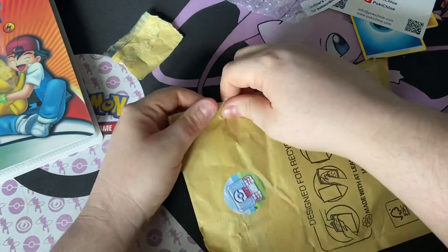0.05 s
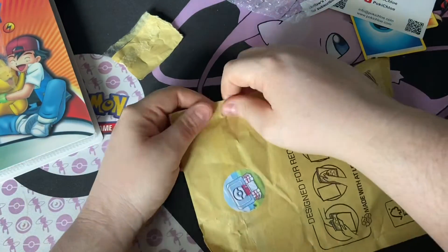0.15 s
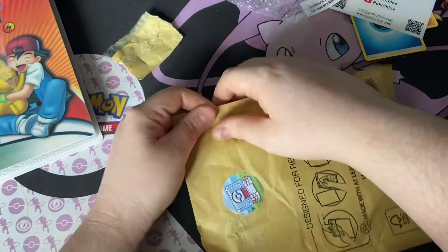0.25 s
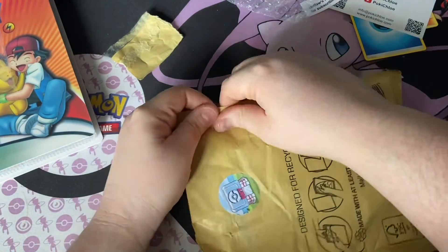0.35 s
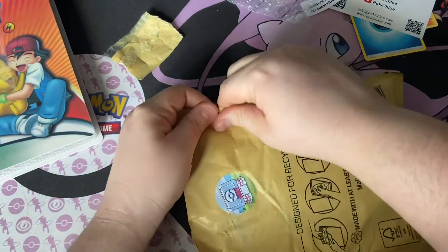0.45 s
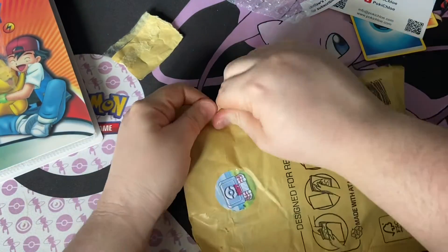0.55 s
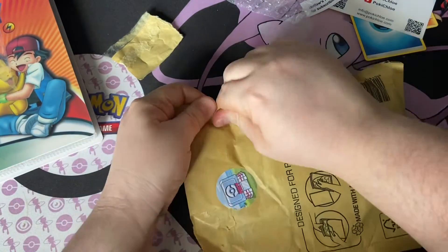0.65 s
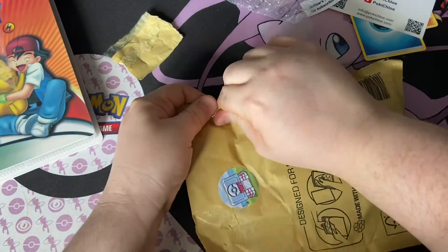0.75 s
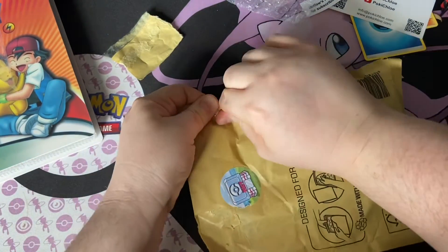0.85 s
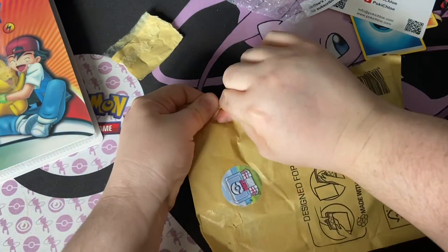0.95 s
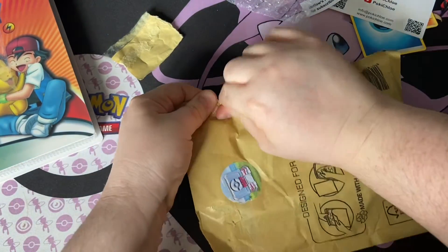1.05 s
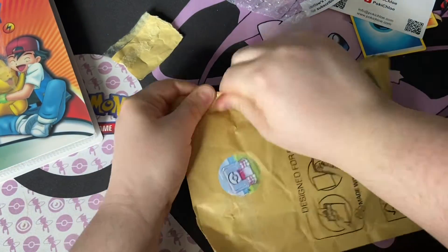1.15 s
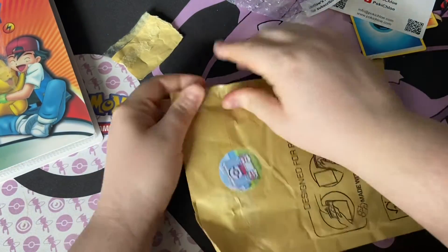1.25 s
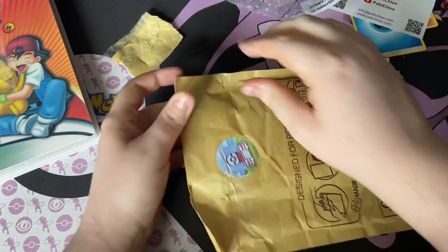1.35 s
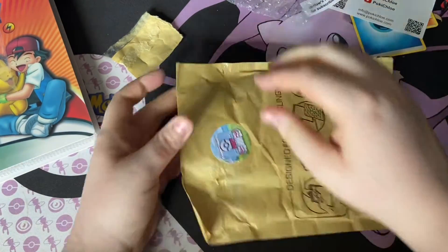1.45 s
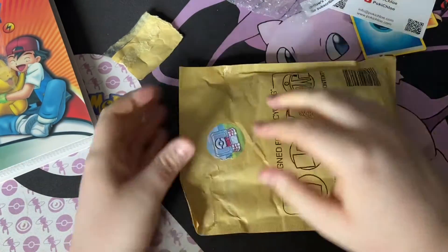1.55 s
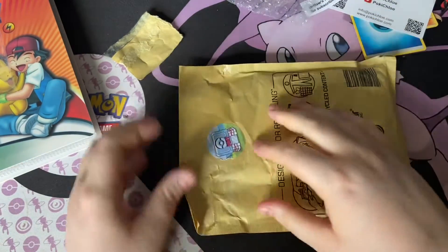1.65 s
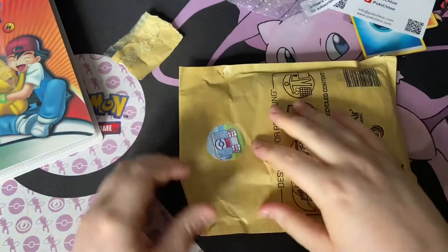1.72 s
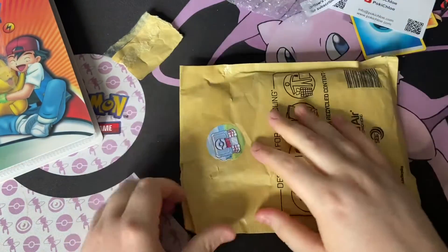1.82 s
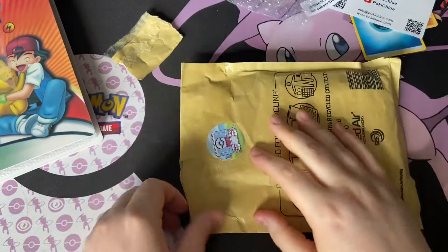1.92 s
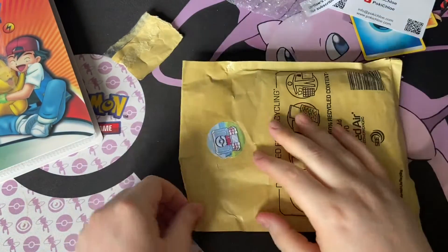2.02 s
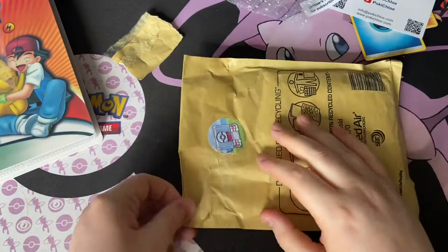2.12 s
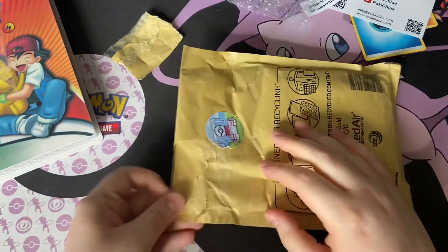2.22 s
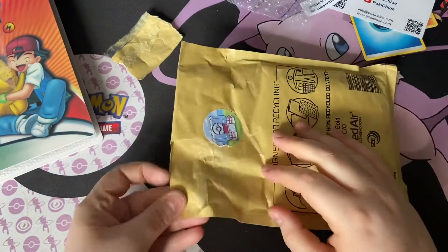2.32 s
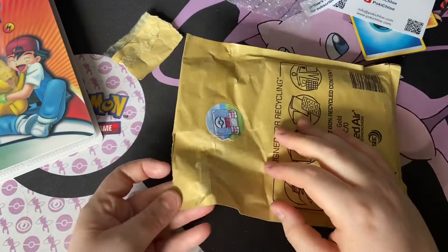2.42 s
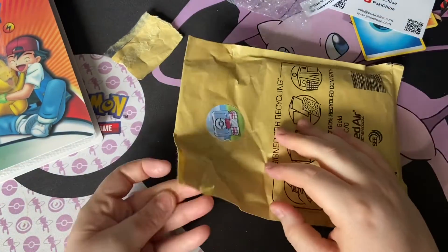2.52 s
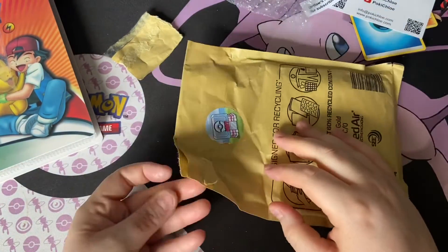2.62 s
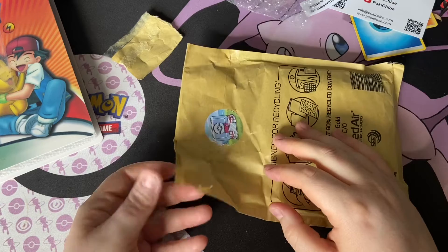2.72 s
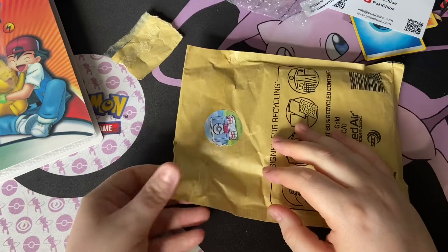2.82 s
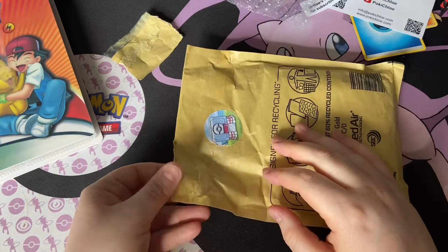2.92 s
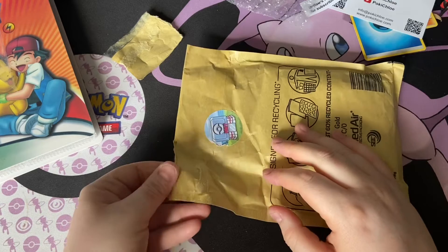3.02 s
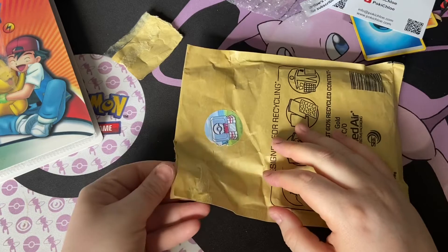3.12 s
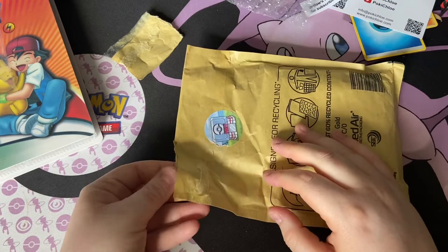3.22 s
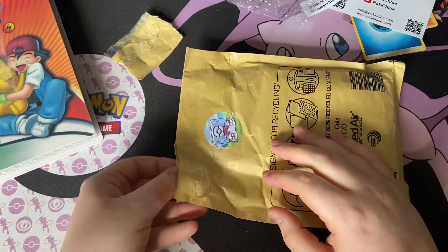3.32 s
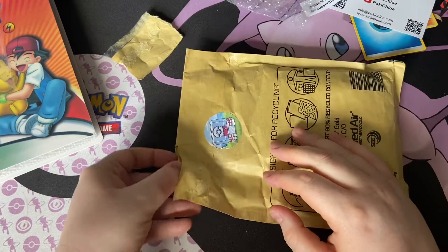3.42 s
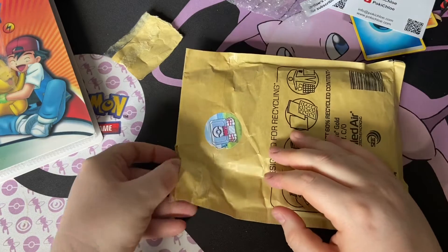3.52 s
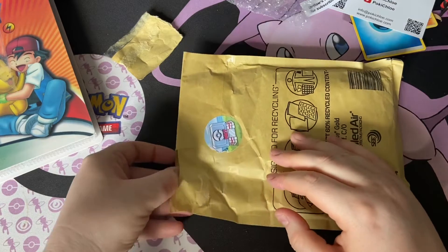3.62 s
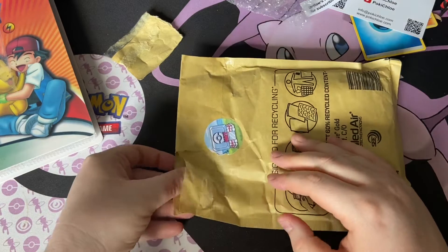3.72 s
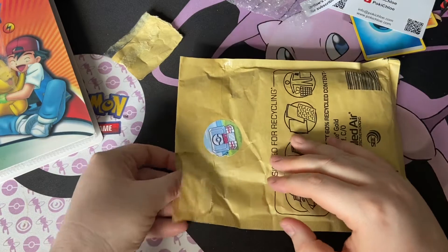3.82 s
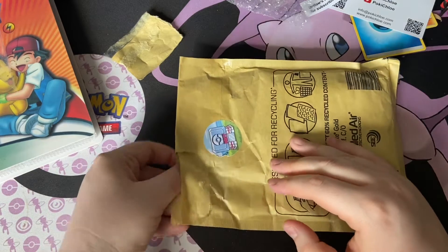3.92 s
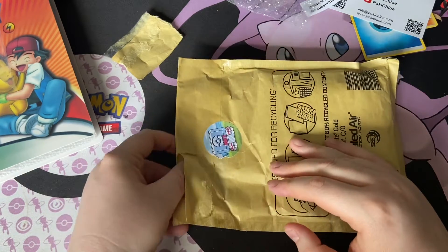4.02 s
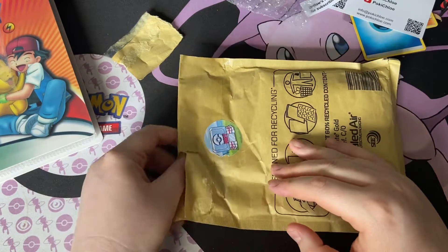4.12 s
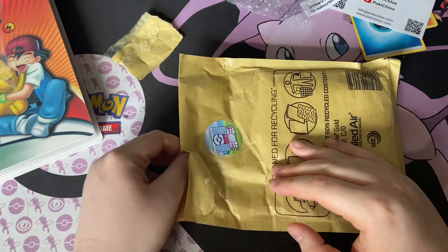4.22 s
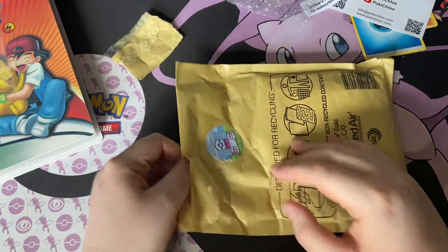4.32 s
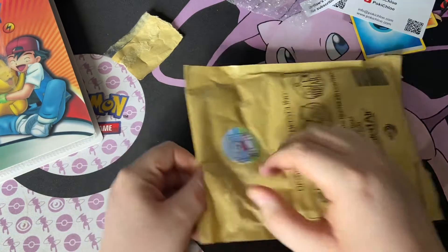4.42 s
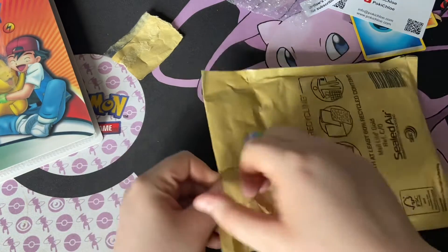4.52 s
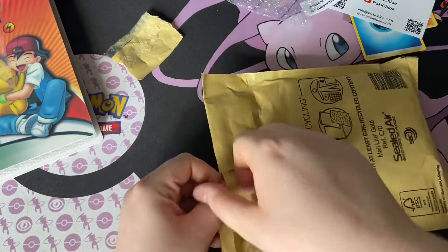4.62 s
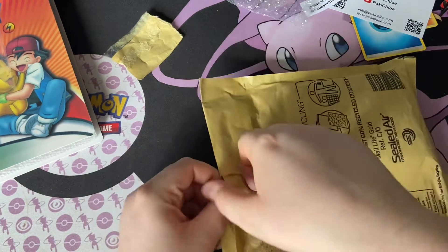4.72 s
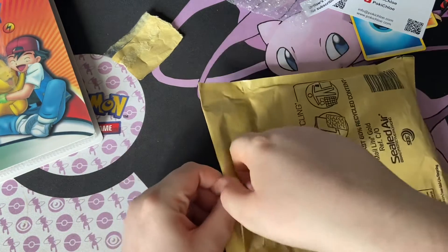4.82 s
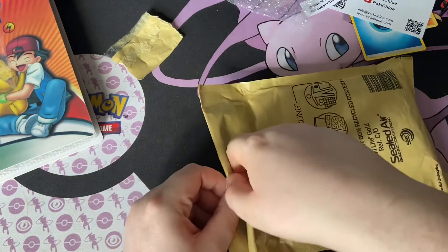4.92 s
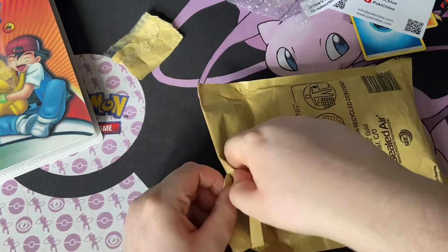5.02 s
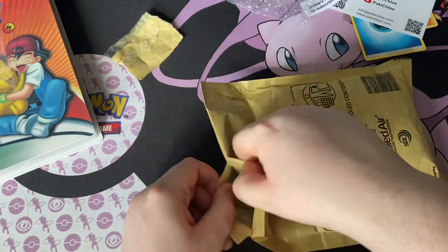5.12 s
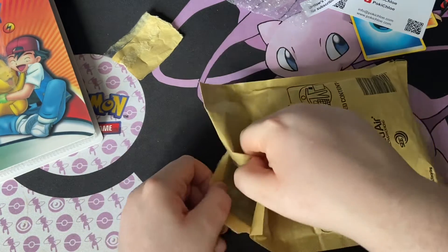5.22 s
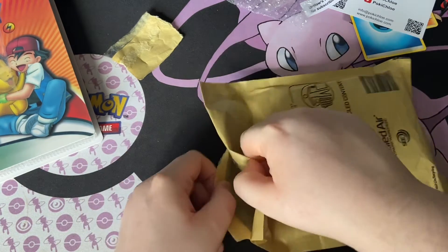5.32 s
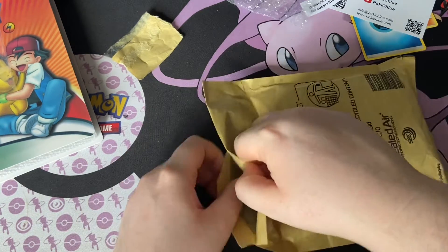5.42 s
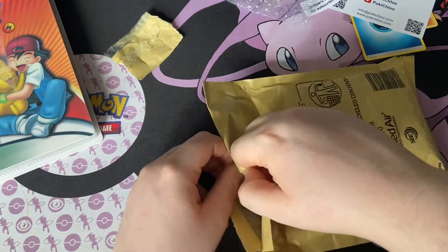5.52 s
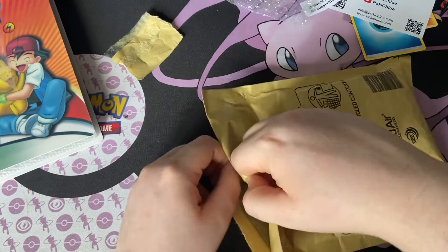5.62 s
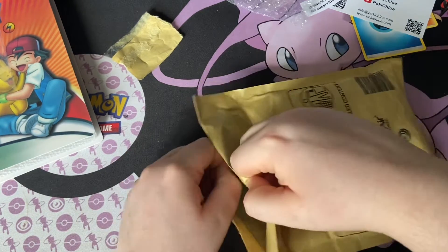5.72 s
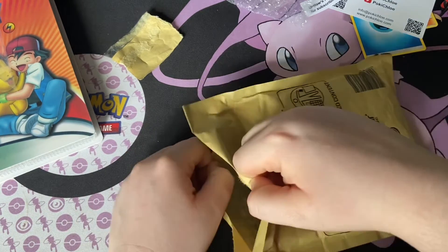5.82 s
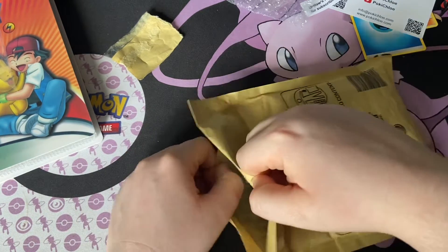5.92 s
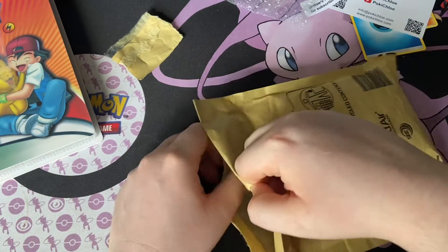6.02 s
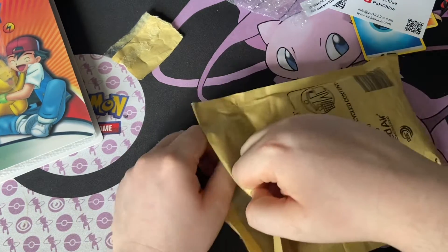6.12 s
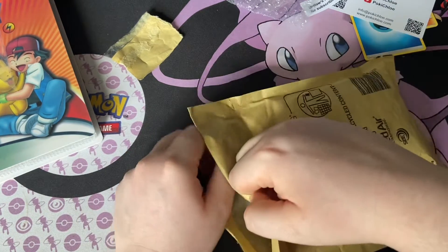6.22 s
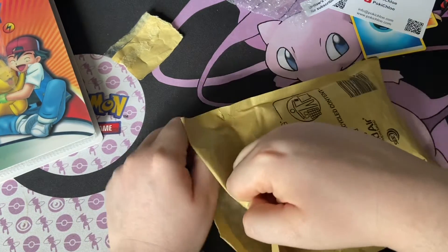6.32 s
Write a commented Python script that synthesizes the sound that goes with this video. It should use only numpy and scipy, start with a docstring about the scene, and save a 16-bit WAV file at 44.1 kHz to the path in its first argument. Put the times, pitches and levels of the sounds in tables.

```python
"""A stiff padded paper mailer is picked at, bent and torn open by hand on a desk in a small room.
From the start creases buckle with sharp snaps and ringing panels over grainy rubbing of fingers on paper.
Early on the flexing pouch knocks hollowly; then soft bumps on the desk ring its resonances.
Near the end the seam gives way in short rips: showers of fibre clicks with stick-slip creases.
Faint room reflections follow the paper; a low rumble and a hiss of filtered noise run throughout."""
import sys
import numpy as np
from scipy import signal
from scipy.fft import rfft, irfft, next_fast_len
from scipy.io import wavfile
from scipy.ndimage import map_coordinates

SR = 44100
rng = np.random.default_rng(int(sys.argv[2]) if len(sys.argv) > 2 else 0)


def inscribe(sig):
    """Save sig as 16-bit PCM at rate SR to the path in sys.argv[1].

    A 1-D sig is mono; a 2-D sig holds one channel per row.
    Samples are clipped to [-1, 1] before scaling.
    """
    pcm = np.round(np.clip(np.atleast_2d(sig).T, -1, 1) * 32767)
    wavfile.write(sys.argv[1], SR, pcm.astype(np.int16))


N = 280276
TIME_S = np.arange(N) / SR
EDGES_HZ = np.geomspace(170, 17500, 16)
BANDS_HZ = list(zip(EDGES_HZ, EDGES_HZ[1:]))
PANEL_HZ = 2060  # reference panel


def from_db(db):
    """Decibels to gain."""
    return 10 ** (np.asarray(db) / 20)


def rms_one(x):
    """Scale to an rms of 1."""
    return x / np.sqrt(np.mean(x ** 2) + 1e-20)


def over_10_ms(x):
    """Scale to the energy of 10 ms at an rms of 1."""
    energy = np.sum(x ** 2, axis=-1, keepdims=True)
    return x / np.sqrt(energy / (SR / 100) + 1e-20)


def at_hz(points, hz):
    """Read a curve on a log-frequency axis."""
    points_hz, values = np.transpose(points)
    return np.interp(np.log(hz), np.log(points_hz), values)


def band_pass(x, low_hz, high_hz):
    """Causal band filter along the last axis."""
    sos = signal.butter(2, [low_hz, high_hz], "band", fs=SR, output="sos")
    return signal.sosfilt(sos, x + 1e-18)


def drift(per_s):
    """Random wander through normal knots, per_s of them each second."""
    knots = rng.standard_normal(8192)
    return np.interp(TIME_S * per_s, np.arange(len(knots)), knots)


def swell(middle_s, half_s):
    """A smooth rise and fall around a moment."""
    return np.exp(-((TIME_S - middle_s) / half_s) ** 2)


# likeness of the two microphone ports: hz, likeness (0 to 1)
PORT_LIKENESS = [(50, 0.98), (250, 0.66), (1000, 0.81), (2500, 0.74), (5000, 0.42), (8000, 1), (15000, 1)]


def ports(mid, side, hz):
    """Left and right share most of the sound; the rest is their own."""
    alike = np.clip(at_hz(PORT_LIKENESS, hz), 0, .999)
    shared = np.sqrt((1 + alike) / 2) * mid
    own = np.sqrt((1 - alike) / 2) * side
    return shared + own * np.array([[1], [-1]])


# spectrum of a snap: hz, band_db
SNAP_SPECTRUM = [(200, -31), (380, -15), (550, -22), (800, -6), (1150, -4), (1600, -6.5), (2700, -5),
                 (4500, -6.5), (7500, -4.5), (11000, -5.5), (15000, -11.5)]


def buckle(rows, rise=0.14, cycles=0.8, ring_cycles=3.85, ring_db=-1.0, flutter_db=-17.0, flutter_s=0.0097):
    """Each crease flips in a burst of cracks; the panel beside it rings a few cycles and the sheet flutters on."""
    # rows: start_s, level_db, body_db, treble_db, ring_hz, decay_s
    start_s, level_db, body_db, treble_db, ring_hz, decay_s = np.array(rows, float).T[:, :, None]
    t_s = np.arange(1600) / SR
    onset = 1 - np.exp(-t_s / (rise * decay_s))
    flutter = from_db(flutter_db) * np.exp(-t_s / flutter_s)

    def tilt_db(hz):
        """Body below, treble above."""
        body_share = at_hz([(1000, 0.94), (2000, 0.082)], hz)
        treble_share = at_hz([(3200, 0.0021), (7500, 1)], hz)
        return body_db * body_share + treble_db * treble_share

    cracks = rng.standard_normal((2, 2, len(start_s), len(t_s)))
    bursts = 0
    for k, (low_hz, high_hz) in enumerate(BANDS_HZ):
        hz = np.sqrt(low_hz * high_hz)
        fade_s = np.hypot(decay_s, cycles / hz)  # low bands last longer
        shape = onset * (np.exp(-t_s / fade_s) + flutter)
        band = over_10_ms(band_pass(cracks[k % 2] * shape, low_hz, high_hz))
        mid, side = band * from_db(at_hz(SNAP_SPECTRUM, hz) + tilt_db(hz))
        bursts = bursts + ports(mid[:, None], side[:, None], hz)

    ring = np.sin(2 * np.pi * ring_hz * t_s) * np.exp(-t_s * ring_hz / ring_cycles) * onset
    ring = over_10_ms(ring) * from_db(ring_db + tilt_db(ring_hz))
    bursts = bursts + ring[:, None]

    out = np.zeros((2, N + len(t_s)))
    starts = np.clip(start_s[:, 0] * SR, 0, N).astype(int)
    for i, burst, gain in zip(starts, bursts, from_db(level_db)):
        out[:, i:i + len(t_s)] += gain * burst
    return out[:, :N]


def panel_body_db(ring_hz, offset_db=2, loss_db=4.2, slope=2.02):
    """Small panels, which ring high, have little body."""
    return offset_db - loss_db * (ring_hz / PANEL_HZ) ** slope


def creases(start_s, level_db, ring_hz, treble_db):
    """Buckling creases whose body and speed follow from the size of their panel."""
    flip_s = 0.0013 * (PANEL_HZ / ring_hz) ** 0.4
    rows = [start_s, level_db, panel_body_db(ring_hz), treble_db, ring_hz, flip_s]
    return buckle(np.column_stack(rows))


# main creases: start_s, level_db, ring_hz, treble_db (re level)
SNAP_EVENTS = [(0.004, -28, 2960, -6), (0.120, -46.5, 1000, -29), (0.2352, -30.5, 2160, -3.5),
               (0.241, -41.5, 914, -1), (0.317, -40.5, 1110, -14), (0.328, -43, 2380, 5.5),
               (0.343, -38, 1730, -6), (0.3505, -35.5, 3220, -10), (0.4452, -36, 2150, -16),
               (0.4584, -30, 1820, -21), (0.490, -43, 1090, -1), (0.5674, -36.5, 1950, -26),
               (0.620, -42, 1310, -4), (0.652, -48.5, 1160, -17), (0.667, -43.5, 1990, -10),
               (0.693, -49, 1220, -21), (0.703, -43, 1140, -25), (0.732, -36, 840, -11.5),
               (0.761, -40, 870, -22), (0.847, -35.5, 1800, -4.5), (0.895, -33.5, 2440, -1),
               (0.971, -27, 2770, -1), (1.008, -35.5, 1390, -12), (1.086, -42.5, 800, -17),
               (1.152, -41, 1180, -10), (1.209, -35.5, 1110, -18), (1.254, -48.5, 1010, -26),
               (1.368, -40.5, 910, -10.5), (1.445, -48, 1070, -15), (1.551, -47.5, 1060, -17),
               (1.657, -41.5, 3740, -20), (1.6874, -36, 1100, -10.5), (1.878, -41.5, 1180, -15),
               (1.971, -30.5, 4340, 1), (2.09, -47.5, 870, -10), (2.212, -40.5, 1530, -8),
               (2.2629, -26.5, 2310, -3), (2.3589, -38.5, 1950, -4.5), (2.430, -40.5, 2860, -10),
               (2.4565, -38.5, 3450, -5), (2.4899, -32.5, 1610, 0), (2.51, -39, 1190, 2.5),
               (2.586, -33, 1230, -9.5), (2.630, -39.5, 2430, 1), (2.7685, -43.5, 2060, -24),
               (2.806, -40, 4150, -6.5), (2.8154, -40, 2600, -12), (3.054, -39.5, 2640, 3.5),
               (3.2646, -43.5, 3250, -4), (3.364, -44.5, 2100, -12), (3.6479, -38, 3230, 6.5),
               (3.695, -39, 3170, 6), (3.8179, -31.5, 3380, 3), (3.898, -43, 1120, -8),
               (3.971, -43.5, 1200, 1), (4.119, -38.5, 3640, -20), (4.2546, -41.5, 3760, 8),
               (4.328, -47, 1170, -28), (4.473, -37, 1090, -6), (4.4861, -33, 970, 2),
               (4.492, -35, 1050, -5), (4.519, -39, 1100, -20), (4.537, -33, 1640, 2),
               (4.551, -34, 2260, 4), (4.6542, -34, 1027, -13), (4.690, -34, 2630, 3.5),
               (4.9272, -36.5, 3230, 8.5), (4.936, -35.5, 3100, -1), (4.9433, -37.5, 1290, -8),
               (5.0962, -32.5, 1830, -7), (5.191, -29.5, 2940, -3), (5.213, -33.5, 1970, -12),
               (5.316, -37.5, 1250, -9.5), (5.3303, -38.5, 1140, -16), (5.370, -41.5, 910, 4.5),
               (5.425, -33, 3230, 6.5), (5.463, -24, 4200, -2), (5.5438, -35, 1110, -12),
               (5.678, -30, 3050, 3), (5.7133, -24, 2240, -30), (5.8123, -35, 1650, 1),
               (5.979, -41.5, 880, -10), (6.0294, -43, 1360, 0.5), (6.137, -41.5, 1200, -7),
               (6.2425, -28, 1990, -23)]


def snaps():
    """The main creases buckle, each with the ring of its own panel."""
    return creases(*np.transpose(SNAP_EVENTS))


def crinkles(from_s, to_s, body_db, count, above_db, spread_db, treble_db, lowest_hz=800, octaves=1.367):
    """Small creases give way at random, as strong as the handling of the moment."""
    when, size, treble, pitch = rng.random((count, 4)).T
    start_s = from_s + (to_s - from_s) * (np.arange(count) + when) / count
    level_db = np.interp(start_s, TIME_S, body_db) + above_db + spread_db * (2 * size - 1)
    ring_hz = lowest_hz * 2 ** (octaves * pitch)
    return creases(start_s, level_db, ring_hz, treble_db + 10 * (treble - .5))


# pulls on the seam, one list each: time_s, level_db
SEAM_PULLS = [
    [(4.905, -39.5), (4.953, -40), (4.965, -28), (4.985, -51.5)],
    [(5.03, -51.5), (5.07, -31), (5.095, -28.5), (5.17, -32.5), (5.18, -26), (5.23, -27), (5.27, -51)],
    [(5.645, -49.5), (5.658, -36.5), (5.688, -42), (5.697, -26.5), (5.753, -28), (5.772, -21),
     (5.812, -28.5), (5.84, -45)],
    [(6.208, -43.5), (6.224, -33.5), (6.237, -23.5), (6.256, -24), (6.276, -25.5), (6.305, -25),
     (6.355, -45.5)],
]


def pull():
    """Strength of the tearing over time, near silence outside the pulls."""
    strength = 0
    for points in SEAM_PULLS:
        s, level_db = np.transpose(points)
        strength = strength + from_db(np.interp(TIME_S, s, level_db, left=-200, right=-200))
    return strength


def jerks(count=76, snap_db=-15.0, spread_db=1.5, body_db=-1.0, treble_db=0.0, decay_s=0.0013):
    """The tear sticks and slips while the pull is strong; one buckling crease for each slip."""
    strength = pull()
    tearing = np.cumsum(strength > from_db(-39))
    late, size, body, treble, pitch = rng.standard_normal((count, 5)).T
    progress = np.clip((np.arange(count) + .5 + .3 * late) / count, .001, .999)
    at = np.searchsorted(tearing, progress * tearing[-1])
    level_db = 20 * np.log10(strength[at]) + snap_db - spread_db * np.clip(size, -2, 1.5)
    ring_hz = 2600 * 2 ** (0.4 * np.clip(pitch, -2, 2))
    return np.column_stack([at / SR, level_db, body_db + 3 * body, treble_db + 3 * treble,
                            ring_hz, np.full(count, decay_s)])


def grains(per_s, spread_db):
    """Tiny clicks at random moments, many weak and a few strong."""
    sizes = from_db(spread_db * np.minimum(rng.exponential(1, N), 4))
    signs = rng.choice([-1, 1], N)
    return sizes * signs * (rng.random(N) < per_s / SR)


def paper_bands(clicks, spectrum, wander_db):
    """Clicks spread through the sheet in bands whose levels wander at random; yields (hz, stereo band)."""
    scattered = clicks * rng.choice([-1, 1], (2, 2, N))
    for k, (low_hz, high_hz) in enumerate(BANDS_HZ):
        hz = np.sqrt(low_hz * high_hz)
        mid, side = band_pass(scattered[k % 2], low_hz, high_hz)
        band_wander_db = wander_db * (drift(110) + drift(14))
        yield hz, ports(rms_one(mid), rms_one(side), hz) * from_db(at_hz(spectrum, hz) + band_wander_db)


# spectrum of breaking fibres: hz, band_db
RIP_SPECTRUM = [(200, -37), (380, -23), (560, -26.5), (800, -19), (1200, -5), (1700, -19.5), (2700, -0.5),
                (4300, -13), (7000, -5.5), (11000, -4), (15000, -6)]


def rips(fibres_per_s=4500, spread_db=3.0, jerk_s=0.004, jerk_share=0.4, level_db=-4.5):
    """Each jerk of the tear cracks the sheet and sets off a shower of breaking fibres."""
    slips = jerks()
    kicks = np.bincount((slips[:, 0] * SR).astype(int), minlength=N)[:N]
    tension = 2 * signal.lfilter([1], [1, -np.exp(-1 / (jerk_s * SR))], kicks)
    fibres = grains(fibres_per_s, spread_db)
    shower = sum(band for hz, band in paper_bands(fibres, RIP_SPECTRUM, wander_db=2.5))
    strength = pull() * (1 - jerk_share + jerk_share * tension)
    return from_db(level_db) * strength * shower + buckle(slips)


def settling(level_db=-17, decay_s=0.025, colour_share=0.5):
    """Power of body and hiss as the paper slides on after each snap, coloured like that snap."""
    start_s, snap_db, ring_hz, treble_db = np.transpose(SNAP_EVENTS)
    at = np.clip(start_s * SR, 0, N - 1).astype(int)
    kicks = []
    for colour_db in (panel_body_db(ring_hz), treble_db):
        power = from_db(snap_db + level_db + colour_share * colour_db) ** 2
        kicks.append(np.bincount(at, power, N))
    return signal.lfilter([1], [1, -np.exp(-2 / (decay_s * SR))], kicks)


# steady friction of the holding hands: time_s, body_db, hiss_db
GRIP_LEVELS = [(0.0, -53, -57.5), (0.55, -52, -54), (0.85, -55, -64), (1.35, -51, -60.5), (1.5, -56, -55.5),
               (2.4, -51.5, -53), (3.3, -61, -55), (4.35, -51, -51.5), (4.8, -55.5, -52.5),
               (5.7, -54, -47.5), (6.3, -45.5, -59.5)]
# hands come to rest: middle_s, half_s, drop_db
GRIP_PAUSES = [(0.176, 0.035, -9), (1.315, 0.048, -1), (1.648, 0.035, -14), (2.7, 0.13, -8),
               (2.907, 0.05, -15), (3.141, 0.043, -34)]
# finger slides: middle_s, half_s, body_db, hiss_db
FINGER_RUBS = [(0.256, 0.032, -45, -46), (0.336, 0.049, -44.5, -51.5), (0.738, 0.022, -41.5, -71),
               (0.976, 0.032, -45.5, -55), (1.204, 0.04, -52, -48.5), (1.571, 0.021, -46, -68),
               (1.857, 0.02, -49, -49), (2.005, 0.062, -72, -47), (2.26, 0.02, -45, -41),
               (2.555, 0.072, -47.5, -53), (3.046, 0.025, -58, -44), (3.226, 0.05, -66, -52),
               (3.347, 0.023, -51, -56), (3.525, 0.055, -49.5, -51.5), (3.695, 0.028, -45, -44),
               (3.82, 0.042, -47.5, -52), (3.983, 0.034, -52, -42.5), (4.135, 0.028, -62, -41.5),
               (4.234, 0.036, -51, -41.5), (4.482, 0.067, -42.5, -46), (5.04, 0.13, -73, -37.5),
               (5.51, 0.052, -51, -45), (6.025, 0.012, -43, -41), (6.133, 0.025, -41.5, -48.5)]


def friction():
    """Body and hiss of the rubbing in dB: the grip with its pauses, finger slides and settling paper."""
    s, *grip_db = np.transpose(GRIP_LEVELS)
    rest_db = sum(drop_db * swell(middle_s, half_s) for middle_s, half_s, drop_db in GRIP_PAUSES)
    grip_power = from_db([np.interp(TIME_S, s, db) + rest_db for db in grip_db]) ** 2
    slide_power = 0
    for middle_s, half_s, *rub_db in FINGER_RUBS:
        slide_power = slide_power + (from_db(rub_db)[:, None] * swell(middle_s, half_s)) ** 2
    return 10 * np.log10(grip_power + slide_power + settling())


# spectrum of rubbed paper: hz, band_db
RUSTLE_SPECTRUM = [(200, -21.5), (370, -14.5), (550, -17.5), (800, -9), (1150, -5.5), (1700, -6.5),
                   (2700, -5.5), (4500, -5.5), (7500, -6), (11000, -4.5), (15000, -7.5)]


def rustle(body_db, hiss_db, grains_per_s=7000, spread_db=2.5, level_db=-3.0):
    """Rough paper slides under the fingers: fine friction grains in the sheet."""
    out = 0
    for hz, band in paper_bands(grains(grains_per_s, spread_db), RUSTLE_SPECTRUM, wander_db=2.5):
        hiss_share = at_hz([(1500, 0.085), (6000, 0.8)], hz)
        out = out + band * from_db(level_db + body_db + hiss_share * (hiss_db - body_db))
    return out


def hands(x, echo_db=-13.0, lag_s=0.000891, lag_spread_db=4.03, moves_per_s=9):
    """The moving hands and folds throw back a close echo, so the colour keeps changing."""
    moving_lag_s = lag_s * from_db(lag_spread_db * drift(moves_per_s))
    read_at = (TIME_S - moving_lag_s) * SR
    echo = np.array([map_coordinates(channel, [read_at], order=3) for channel in x])
    return (x + from_db(echo_db) * echo) / np.hypot(1, from_db(echo_db))


def resonate(force, hz, t60_s):
    """A unit push sets a decaying sine of height near 1 ringing."""
    r, w = 10 ** (-3 / (t60_s * SR)), 2 * np.pi * hz / SR
    return signal.lfilter([0, np.sin(w)], [1, -2 * r * np.cos(w), r * r], force + 1e-18)


def pushes(start_s, level_db, contact_s):
    """One soft push of unit area, scaled to its level."""
    push = np.sin(np.pi * np.clip((TIME_S - start_s) / contact_s, 0, 1)) ** 2
    return from_db(level_db) * push / (push.sum() + 1e-9)


# whole pouch flexing: start_s, level_db
POUCH_FLEXES = [(0.46, -41), (0.622, -42), (0.847, -32.5), (0.897, -39), (0.973, -34), (1.089, -37.5),
                (1.209, -41)]


def pouch(pouch_hz=368, t60_s=0.058, contact_s=0.0011):
    """The padded walls and the air between them ring briefly when the pouch flexes."""
    force = sum(pushes(start_s, level_db, contact_s) for start_s, level_db in POUCH_FLEXES)
    return band_pass(resonate(force, pouch_hz, t60_s), 240, 600)


# mailer and hands landing on the desk: start_s, level_db, contact_s
DESK_BUMPS = [(1.2, -56, 0.009), (1.241, -50, 0.01), (1.565, -46.5, 0.0054), (1.593, -43.5, 0.0098),
              (2.269, -42.5, 0.011), (2.514, -44.5, 0.0045), (4.452, -52, 0.0073)]
# desk resonances: mode_hz, mode_db, t60_s
DESK_RESONANCES = [(54.7, 2.5, 0.23), (78, 2, 0.2), (113, 9, 0.052), (136.6, 5, 0.29)]


def desk(shake_db=-63.5):
    """Soft pushes set the desk top ringing, a longer contact only its low modes; tearing shakes it too."""
    force = sum(pushes(*bump) for bump in DESK_BUMPS)
    force = force + from_db(shake_db) * pull() * rng.standard_normal(N)
    return sum(from_db(mode_db) * resonate(force, mode_hz, t60_s) for mode_hz, mode_db, t60_s in DESK_RESONANCES)


def room(x, t60_s=0.21, gap_s=0.005, treble_db=-31.0):
    """Dense reflections from the desk and the walls, different at each port."""
    t_s = TIME_S[:SR // 2]
    tail = rng.standard_normal((2, len(t_s))) * 10 ** (-3 * t_s / t60_s)
    tail = tail * np.clip(t_s / gap_s - 1, 0, 1)
    dull = signal.sosfilt(signal.butter(1, 5000, fs=SR, output="sos"), tail)
    echo = dull + from_db(treble_db) * (tail - dull)
    return signal.fftconvolve(x, echo / np.sqrt(np.sum(tail ** 2) / 2), axes=-1)[:, :N]


# room background: hz, band_db
ROOM_SPECTRUM = [(28, -82), (40, -74), (54, -62.5), (75, -70.5), (130, -71), (200, -72.5), (370, -79.5),
                 (600, -81), (1500, -71), (5000, -87), (15000, -77)]


def room_tone(waver_db=2.5):
    """A low rumble and a faint hiss, wavering together: noise shaped in frequency."""
    hz = np.fft.rfftfreq(N, 1 / SR) + 1
    band_to_bin = np.sqrt(SR / 2 / (.3 * hz))
    gain = from_db(at_hz(ROOM_SPECTRUM, hz)) * band_to_bin * (hz > 20)
    mid, side = rfft(rng.standard_normal((2, N))) * gain
    return irfft(ports(mid, side, hz), N) * from_db(waver_db * drift(7.3))


def scene():
    """The mailer close by, the desk under it and the room around."""
    body_db, hiss_db = friction()
    picking = crinkles(0.3, 1.27, body_db, count=55, above_db=-2.5, spread_db=6.5, treble_db=-13.0)
    turning = crinkles(1.27, 6.35, body_db, count=130, above_db=-1.5, spread_db=4.5, treble_db=-10.0)
    handled = snaps() + picking + turning + rustle(body_db, hiss_db) + rips()
    paper = hands(handled) + pouch()
    return paper + from_db(-11.5) * room(paper) + desk() + room_tone()


# port level difference: hz, left_minus_right_db
PORT_BALANCE = [(60, 0.65), (250, 1.5), (700, 2.5), (1300, 1.2), (2400, 2.3), (4400, 4.2), (8000, 0.1),
                (15000, 0.1)]
# port phase difference: hz, left_lead_rad
PORT_LEAD = [(20, 0), (1000, .2), (2200, .55), (4000, .1), (7400, 0), (9000, -3.1), (11100, -6.3),
             (13200, -9.4), (15400, -12.5)]


def record(dry, low_cut_hz=38, high_cut_hz=16300):
    """The two ports differ in level and phase; the deep bass and the top are cut."""
    size = next_fast_len(N + 4096)
    hz = np.fft.rfftfreq(size, 1 / SR) + 1
    left, right = rfft(dry, size)
    lean = from_db(at_hz(PORT_BALANCE, hz) / 2)
    lead = np.exp(1j * at_hz(PORT_LEAD, hz))
    heard = irfft(np.array([left * lean * lead, right / lean]), size)[:, :N]
    heard = signal.sosfilt(signal.butter(4, low_cut_hz, "high", fs=SR, output="sos"), heard)
    return signal.sosfilt(signal.ellip(10, .2, 80, high_cut_hz, fs=SR, output="sos"), heard)


dry = scene()
out = record(dry)
inscribe(out)
```